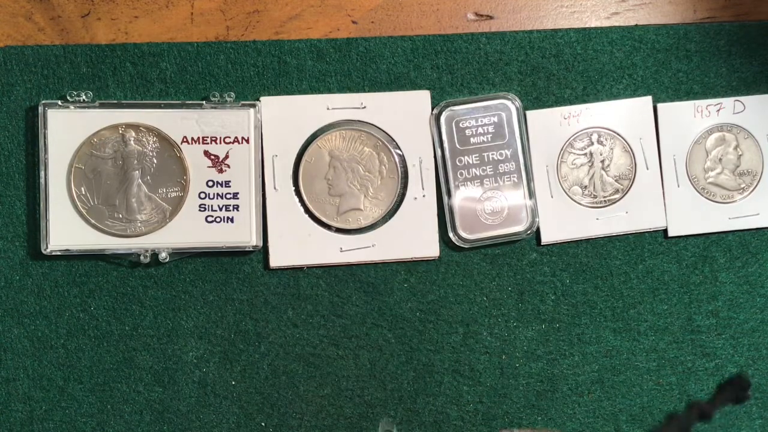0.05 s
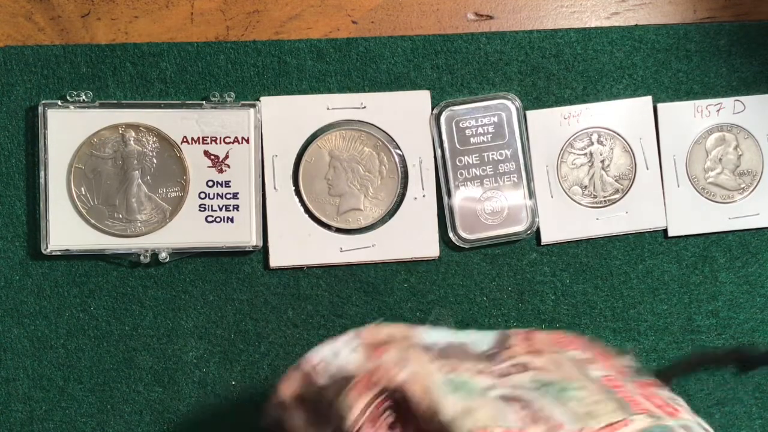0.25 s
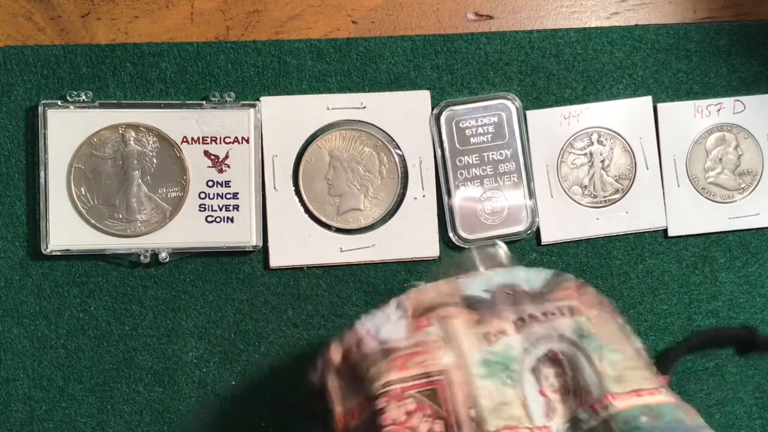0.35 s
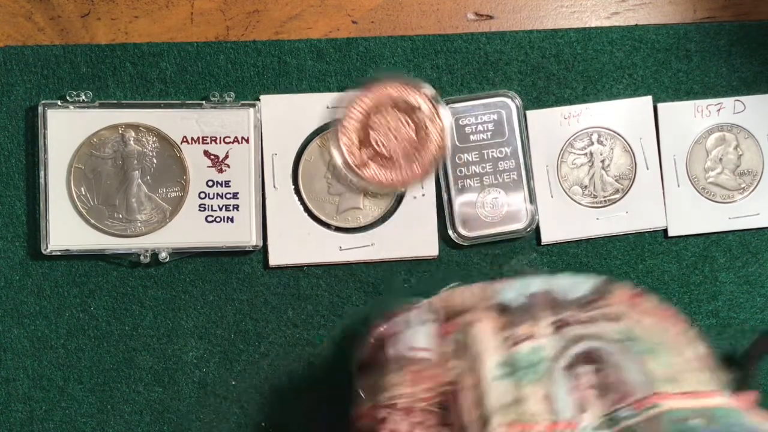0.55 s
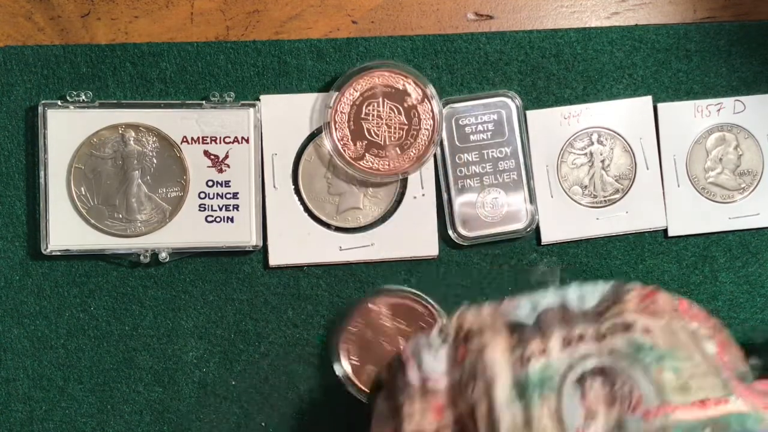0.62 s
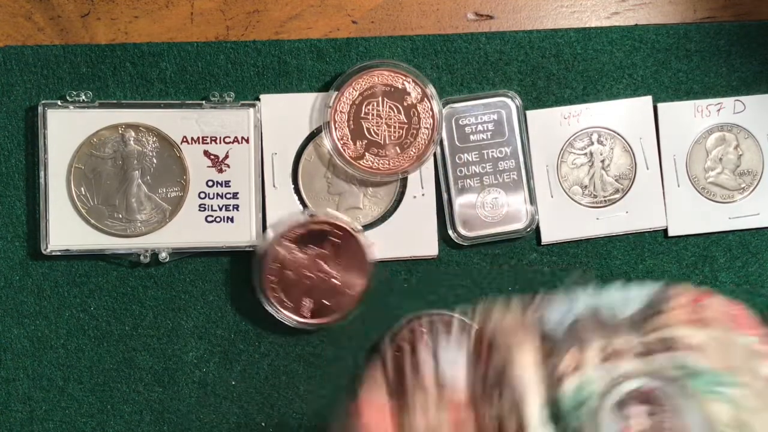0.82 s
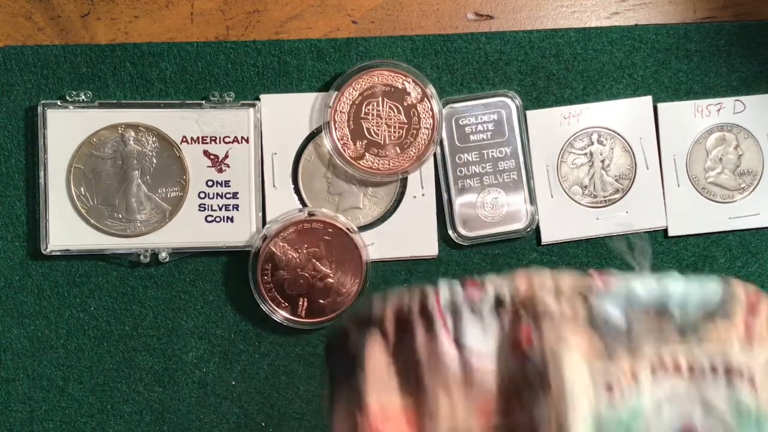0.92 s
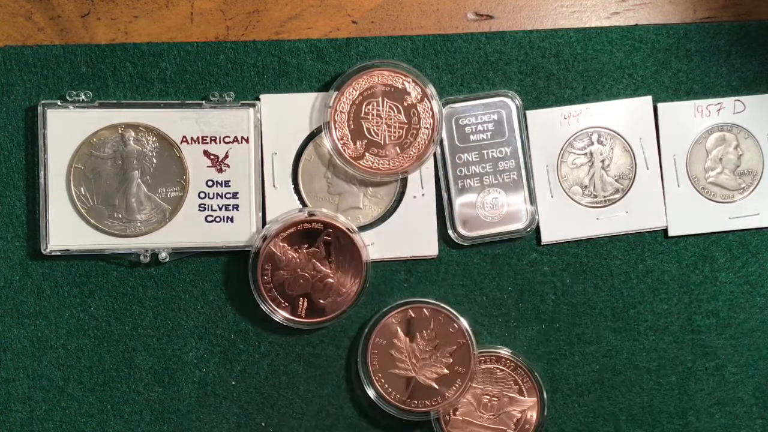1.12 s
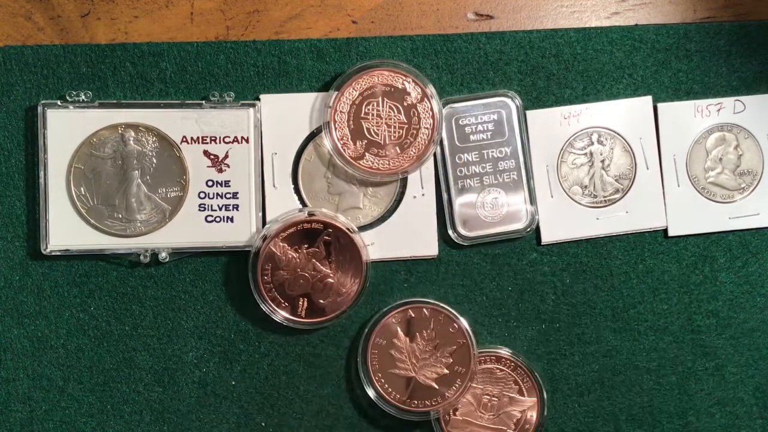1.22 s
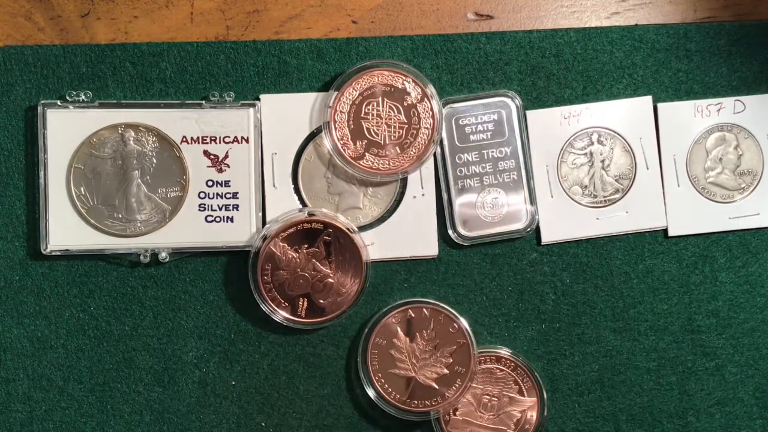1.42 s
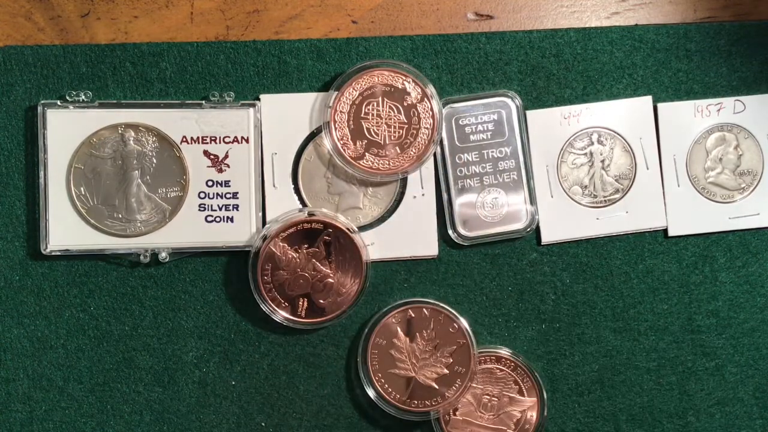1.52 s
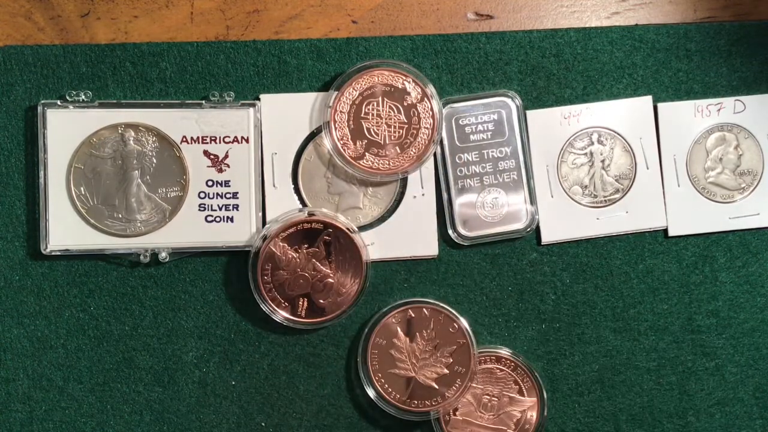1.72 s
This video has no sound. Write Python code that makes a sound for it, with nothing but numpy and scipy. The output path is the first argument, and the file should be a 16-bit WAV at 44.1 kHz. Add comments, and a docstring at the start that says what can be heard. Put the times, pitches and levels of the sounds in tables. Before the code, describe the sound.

Coin capsules of hard plastic clatter onto a felt-covered table, close up in a small room. A faint click and soft thump come by 0.25 s, sharp clacks at 0.3-0.4, then a louder cluster at 0.63-0.85 with bright coin chinks, hollow holder knocks and low thumps. The last capsule rattles out by about 1 s. Very faint pouch rustle and taps follow around 1.2-1.4 over quiet, bassy room noise.

```python
"""In a small room, copper coins in hard plastic capsules slide out of a cloth pouch onto a felt-covered table.
Capsules clack together: noisy contacts drive resonances of shells, capsules, coin and table, with room echoes.
Loose coins chink as very short bright clicks, and the last capsule rattles to rest as a run of tiny touches.
Flat coin holders knock with a hollow note; landings thump the felt as a few low cycles, one with a dull knock.
Filtered noise makes the faint rustle and taps of the pouch as it is drawn away, and the quiet room noise."""
import sys
import numpy as np
from scipy import signal
from scipy.fft import rfft, irfft, next_fast_len
from scipy.io import wavfile

SR = 44100
rng = np.random.default_rng(int(sys.argv[2]) if len(sys.argv) > 2 else 0)


def transcribe(u):
    """Save the signal u as a 16-bit wav file named by the first command-line argument.

    u: samples, shape (n,) or (channels, n), limited to [-1, 1]; the rate is SR.
    q: integer samples, one column per channel.
    """
    v = np.clip(np.atleast_2d(u).T, -1, 1)
    q = np.round(v * 32767).astype(np.int16)
    wavfile.write(sys.argv[1], SR, q)


N = 77175
T = np.arange(int(.6 * SR)) / SR   # time axis of one blow [s]
BLOW_GAIN = np.sqrt(.025 * SR)   # turns energy 1 into RMS 1 over 25 ms
TOUCHES_PER_S = 650   # mean rate of tiny touches in a buzz or rattle

# resonances of the coin: (frequency [Hz], relative level [dB], T60 [s])
COIN = [(7800, 2.7, 0.0018), (8450, 5.4, 0.027), (8880, 8, 0.0029), (9640, 5.9, 0.0019)]
# spectrum of the bare crack of plastic on plastic: (frequency [Hz], relative level per Hz [dB])
CRACK = [(100, -2.5), (250, 3.5), (600, 5), (1200, -1.5), (2200, 2.5), (3500, 4.5), (5200, 4), (7000, -0.5),
         (9300, -4), (10800, -3.5), (13000, -9), (16000, -18)]


def from_db(db):
    """Logarithmic level: 20 dB is a factor of ten in amplitude."""
    return 10 ** (np.asarray(db) / 20)


def unit(x):
    """Energy normalisation: the squares sum to 1."""
    return x / np.sqrt(np.sum(x ** 2) + 1e-20)


def fade(t60):
    """Exponential damping: the amplitude falls by 60 dB in t60 seconds."""
    return np.exp(-np.log(1000) * T / t60)


def at_hz(points, hz):
    """Interpolation of a spectrum on a logarithmic frequency axis."""
    f, v = np.transpose(points)
    return np.interp(np.log(np.maximum(hz, 1)), np.log(f), v)


def add(out, s, x):
    """Linear superposition: mix in a sound that starts at s seconds."""
    i = max(int(s * SR), 0)
    out[i:i + len(x)] += x[:len(out) - i]


def colour(x, spectrum, tilt_db=0):
    """Minimum-phase filtering: a folded cepstrum makes the response causal; the tilt acts above 500 Hz."""
    n = 2 * next_fast_len(len(x))
    hz = np.arange(n // 2 + 1) * SR / n
    octaves = np.log2(np.maximum(hz, 500) / 500)
    gain = from_db(at_hz(spectrum, hz) + tilt_db * octaves)
    cepstrum = irfft(np.log(gain))
    cepstrum[1:n // 2] *= 2
    cepstrum[n // 2 + 1:] = 0
    response = np.exp(rfft(cepstrum))
    return irfft(rfft(x, n) * response)[:len(x)]


def ring(x, modes):
    """Modal superposition: damped resonators, each with its own share of energy, answer one force."""
    out = 0
    for k, (hz, db, t60) in enumerate(modes):
        radius = np.exp(-np.log(1000) / (t60 * SR))
        angle = 2 * np.pi * hz / SR
        poles = [1, -2 * radius * np.cos(angle), radius * radius]
        mode = unit(signal.lfilter([1, 0, -1], poles, x))
        out = out + (-1) ** k * from_db(db) * mode   # signs alternate from mode to mode
    return unit(out)


def swell(hz, length):
    """Cushioned impact: a half-sine envelope limits the low tone to a few cycles."""
    envelope = np.sin(np.pi * np.minimum(T / length, 1))
    return unit(envelope * np.sin(2 * np.pi * hz * T))


def noise_around(hz, size):
    """Band-limited noise: a gentle filter passes about two octaves."""
    band = signal.butter(1, [hz / 2, min(hz * 2, SR / 2 - 1)], "band", fs=SR, output="sos")
    return signal.sosfilt(band, rng.standard_normal(size))


def room(hit=(1.,)):
    """Reverberation: sparse near reflections repeat the hit; a diffuse tail decays at a rate set by frequency."""
    # reverberation time: (frequency [Hz], T60 [s])
    room_t60 = [(150, 0.42), (600, 0.3), (1600, 0.35), (2900, 0.38), (5000, 0.29), (15000, .22)]
    early_db, early_t60_s, echoes_per_s, first_echo_s = 1, 0.1, 1800, 0.002   # level against the tail
    white = rfft(rng.standard_normal(len(T)))
    hz = np.arange(len(white)) * SR / len(T)
    centres, t60s = np.transpose(room_t60)
    tail = 0
    for share, t60 in zip(np.eye(len(t60s)), t60s):
        band_gain = at_hz(np.c_[centres, share], hz)   # overlapping bands that sum to 1
        tail = tail + irfft(white * band_gain, len(T)) * fade(t60)
    arrivals = rng.random(len(T)) < echoes_per_s / SR
    early = rng.standard_normal(len(T)) * arrivals * fade(early_t60_s)
    arrived = T > first_echo_s
    reflections = unit(signal.fftconvolve(early * arrived, hit)[:len(T)])
    return unit(unit(tail * arrived) + from_db(early_db) * reflections)


def contact():
    """Contact noise: a gritty snap, then the coin buzzes in its seat as a dying run of tiny touches."""
    # levels are against the room echoes
    snap_db, snap_t60_s = -6, 0.008
    chatter_db, chatter_t60_s, touch_t60_s = -4.5, 0.043, 0.0028
    snap = unit(rng.standard_normal(len(T)) * fade(snap_t60_s))
    touches = (rng.random(len(T)) < TOUCHES_PER_S / SR) + 1.0 * (T == 0)
    touch_decay = np.exp(-np.log(1000) / (touch_t60_s * SR))
    grain = signal.lfilter([1], [1, -touch_decay], touches + 1e-18)
    chatter = unit(rng.standard_normal(len(T)) * grain * fade(chatter_t60_s))
    return from_db(snap_db) * snap + from_db(chatter_db) * chatter


def clacks():
    """Modal excitation: capsules collide, and which capsule is struck decides how much each resonator rings."""
    # hard contacts: (time [s], crack level [dB], crack tilt [dB per octave], shell knock level [dB],
    # ring level of first capsule [dB], ring level of second capsule [dB], coin chink level [dB],
    # table level [dB])
    contacts = [ (.0055, -48.5, 0, -55.5, -92, -63, -81, -85), (0.1077, -64, -1, -64.5, -79, -59, -87, -77),
                (0.2427, -43, -2.5, -49.5, -65, -51.5, -71, -63),
                (0.2639, -43, -2, -69, -68, -70, -70, -54),
                (0.31, -28.5, -2.74, -50, -49.5, -60, -40.5, -34),
                (0.3321, -31.5, -0.1, -37.5, -56, -48, -42, -27.5),
                (0.3524, -33.5, 1, -35.5, -62, -41, -47.5, -45.5),
                (.4020, -39, 3, -39.5, -49, -46, -52, -41),
                (0.4112, -31, 1.5, -36.5, -56, -41.5, -43, -36.5),
                (0.5673, -49, 0.5, -54, -67, -50, -71, -52.5), (0.595, -51, 1.5, -54, -62, -47, -78, -65),
                (0.6362, -25, 1.5, -38.5, -39, -40, -36, -37),
                (0.6434, -31.5, 3.5, -31, -26.5, -34, -48, -45),
                (0.6805, -24.5, -0.67, -36.5, -35, -30, -34.5, -29),
                (0.7568, -32, -1, -42, -58, -33.5, -39.5, -43),
                (0.7755, -34.5, 0.5, -48, -44, -39, -58, -38.5),
                (0.8252, -35.5, 0, -37, -44, -29, -47.5, -43)]
    # resonances of shell, two capsules and table: (frequency [Hz], relative level [dB], T60 [s])
    shell = [(1620, -5, 0.068), (1927, 7, 0.051), (2108, 4.5, 0.046), (2316, 10, 0.06), (2503, 8.5, 0.028)]
    first_capsule = [(2978, 11.5, 0.063), (3770, 4, 0.032)]
    second_capsule = [(2690, -5, .05), (2745, -3, .07), (2808, -2, .08), (2930, 4, .005), (3055, -2, .075),
                      (3120, -3, .06)]
    table = [(191, -5.5, 0.053), (240.9, 2.5, 0.22), (322.2, 3, 0.12), (384.2, 1, 0.14), (583, -3.5, 0.042),
             (760, -10.5, 0.14), (1424, -17.5, 0.11)]
    # echoes against the direct ring, for shell, first capsule, second capsule, coin, table: (relative level [dB])
    echo_db = [-6.5, -1.5, -7.5, -6.5, -2]
    size_spread = 0.0057   # standard deviation of relative pitch: capsules differ slightly
    out = np.zeros(N)
    for s, crack_db, tilt_db, *ring_db in contacts:
        hit = contact()
        echoes = room(hit)
        detune = [1 + size_spread * rng.standard_normal(), 1, 1]   # only the frequency shifts
        plastic_and_coin = (shell, first_capsule, second_capsule, COIN)
        resonators = [np.array(modes) * detune for modes in plastic_and_coin] + [table]
        sound = from_db(crack_db) * unit(colour(hit + echoes, CRACK, tilt_db))
        for db, room_db, modes in zip(ring_db, echo_db, resonators):
            ringing = ring(hit, modes) + from_db(room_db) * ring(echoes, modes)
            sound = sound + from_db(db) * unit(ringing)
        add(out, s, sound)
    return out


def chinks():
    """Impulsive excitation: a loose coin rebounds in its seat with a very short, bright click."""
    # coin rebounds: (time [s], level [dB])
    rebounds = [(0.2319, -56.5), (0.6824, -26.5), (0.6859, -28.5), (0.6912, -36), (0.7601, -37),
                (0.8422, -46)]
    click_t60_s, room_db = 0.0077, -2.5
    crack_db, tilt_db = 1, 2.5   # crack against the coin's ring [dB], its slope [dB per octave]
    out = np.zeros(N)
    for s, db in rebounds:
        click = unit(rng.standard_normal(len(T)) * fade(click_t60_s)) + from_db(room_db) * room()
        crack = unit(colour(click, CRACK, tilt_db))
        add(out, s, from_db(db) * unit(ring(click, COIN) + from_db(crack_db) * crack))
    return out


def rattle():
    """Repeated impact: the last capsule shivers to rest, its dying touches heard through one broad resonance."""
    start_s, level_db, t60_s = 0.831, -35.5, 0.22
    body = [(2800, 0, 0.0026)]   # shell resonance: (frequency [Hz], relative level [dB], T60 [s])
    out = np.zeros(N)
    arrivals = rng.random(len(T)) < TOUCHES_PER_S / SR
    touches = rng.standard_normal(len(T)) * arrivals * fade(t60_s)
    once = ring(unit(touches) + room(), body)
    add(out, start_s, from_db(level_db) * ring(once, body))   # the second pass narrows the resonance
    return out


def knocks():
    """Impulse response: a capsule drops on a flat holder, whose hollow note depends on the spot struck."""
    # drops on holders: (time [s], level [dB], pitch [Hz])
    drops = [(0.636, -37, 680), (0.681, -34.5, 600), (0.775, -41.5, 655)]
    # upper resonances of the holder: (frequency [Hz], relative level [dB], T60 [s])
    holder = [(1033, -4, 0.082), (1434, -7, .05)]
    note_t60_s, room_db = 0.042, -5.5
    impulse = 1.0 * (T == 0)
    out = np.zeros(N)
    for s, db, hz in drops:
        modes = [(hz, 0, note_t60_s)] + holder
        note = ring(impulse, modes) + from_db(room_db) * ring(room(), modes)
        add(out, s, from_db(db) * unit(note))
    return out


def thumps():
    """Compliant contact: felt cushions a landing to a few low cycles, and the whole table sways lower still."""
    # soft landings on the felt: (time [s], level [dB], pitch [Hz], length [s])
    landings = [(0.225, -34, 208, 0.016), (0.3035, -33, 216, 0.013), (0.3171, -31.5, 217, 0.016),
                (0.3355, -30, 210, 0.015), (0.346, -37, 301, 0.014), (0.563, -45.5, 187, 0.019),
                (0.633, -33, 209, 0.015), (0.686, -33.5, 247, 0.016), (0.7304, -32, 225, 0.01424),
                (1.734, -55, 230, 0.03)]
    # shakes of the whole table: (time [s], level [dB])
    sways = [(0.23, -40.5), (.40, -45), (0.633, -36), (0.831, -50)]
    room_db = -4   # echoes against the direct thump
    out = np.zeros(N)
    for s, db, hz, length in landings:
        push = swell(hz, length)
        echoes = unit(signal.fftconvolve(push, room())[:len(T)])
        add(out, s, from_db(db) * push)
        add(out, s + length / 2, from_db(db + room_db) * echoes)
    for s, db in sways:
        add(out, s, from_db(db) * swell(63, 0.081))   # pitch [Hz], length [s]
    return out


def dull_knocks():
    """Damped noise: the mid-range knock of a landing, then faint taps as the pouch drags over the table."""
    # the first row is the landing, the later rows the pouch: (time [s], level [dB], centre before dulling [Hz])
    touches = [(0.227, -55, 1160), (1.229, -63, 695), (1.379, -61.5, 915)]
    out = np.zeros(N)
    for s, db, hz in touches:
        lowpass = signal.butter(2, hz * 1.1, fs=SR, output="sos")
        dull = signal.sosfilt(lowpass, noise_around(hz, len(T)))
        add(out, s, from_db(db) * unit(dull * fade(0.12)))
    return out


def rustle():
    """Friction noise: brushes of the cloth swell and fade as bands of noise."""
    # brushes of the cloth: (time of peak [s], time from peak to 1/e [s], peak level [dB], centre [Hz])
    brushes = [(1.274, 0.24, -67.5, 596), (1.354, 0.018, -64, 3070)]
    out, t = np.zeros(N), np.arange(N) / SR
    for s, length, db, hz in brushes:
        cloth = np.sqrt(N) * unit(noise_around(hz, N))   # RMS 1
        out += from_db(db) * cloth * np.exp(-((t - s) / length) ** 2)
    return out


def room_noise():
    """Stationary noise: a fixed spectrum, strongest in the bass, shapes white noise."""
    # spectrum of the room noise: (frequency [Hz], relative level per Hz [dB])
    air = [(25, 5), (80, -7), (260, -11), (500, -21.5), (1200, -26), (4000, -27.5), (9500, -33),
           (11500, -41), (16000, -44.5)]
    level_db = -53.5   # RMS
    return from_db(level_db) * np.sqrt(N) * unit(colour(rng.standard_normal(N), air))


def scene():
    """Superposition of capsules, table, cloth and room noise in one channel."""
    blows = clacks() + chinks() + rattle() + knocks() + thumps() + dull_knocks()
    return (BLOW_GAIN * blows + rustle() + room_noise())[None]


def record(dry):
    """Low-pass filtering: an elliptic filter cuts steeply above 15.7 kHz."""
    lowpass = signal.ellip(10, .2, 70, 15700, fs=SR, output="sos")   # ripple and stopband [dB], edge [Hz]
    return signal.sosfilt(lowpass, dry)


dry = scene()
out = record(dry)
transcribe(out)
```